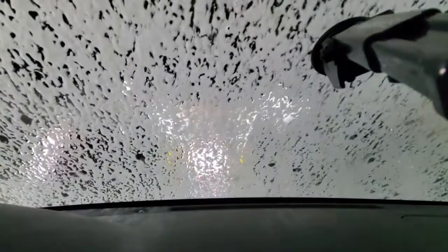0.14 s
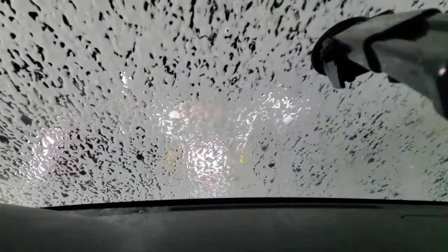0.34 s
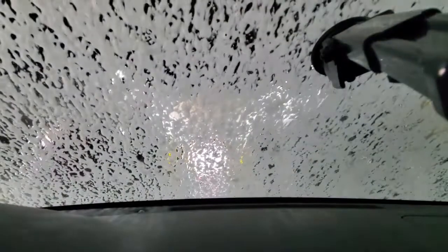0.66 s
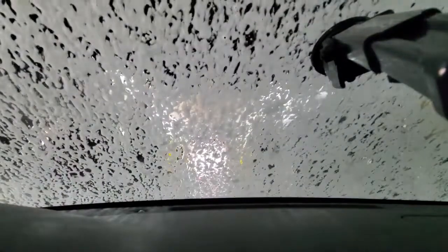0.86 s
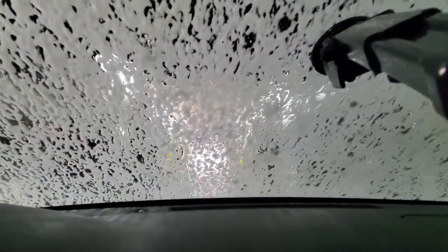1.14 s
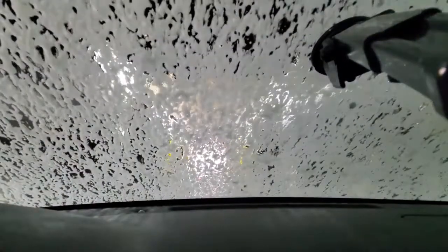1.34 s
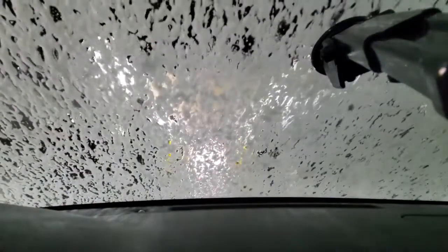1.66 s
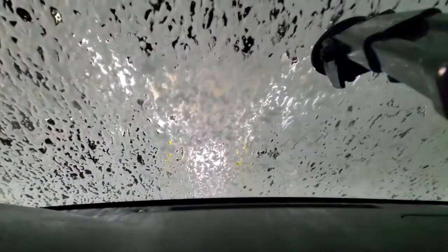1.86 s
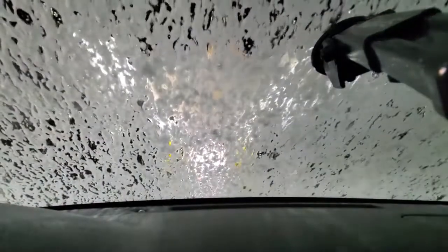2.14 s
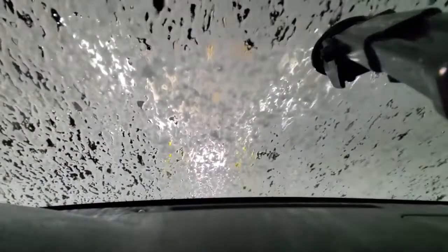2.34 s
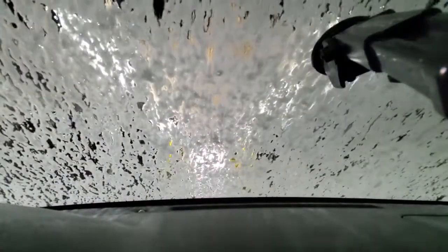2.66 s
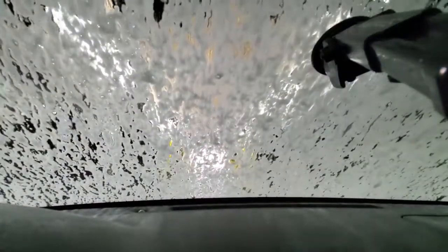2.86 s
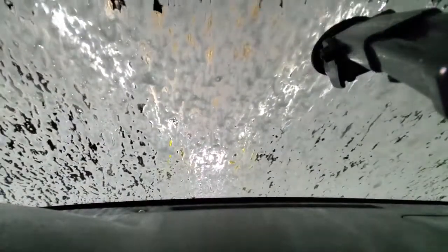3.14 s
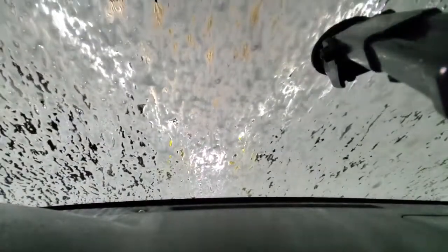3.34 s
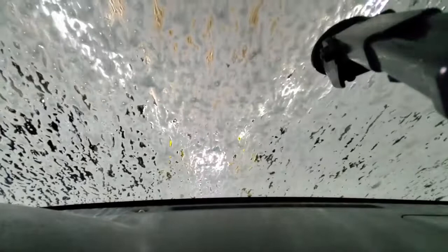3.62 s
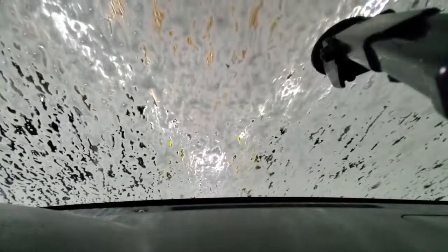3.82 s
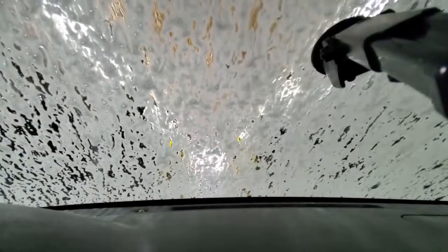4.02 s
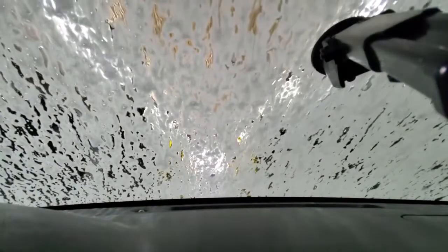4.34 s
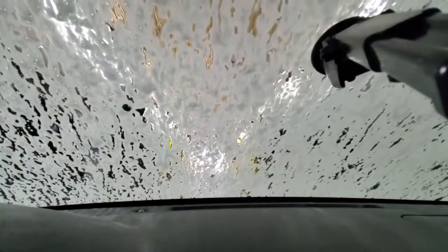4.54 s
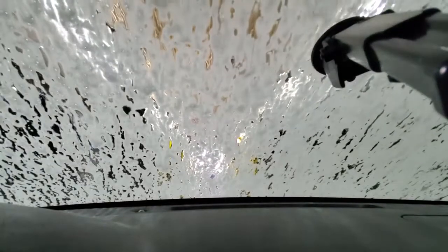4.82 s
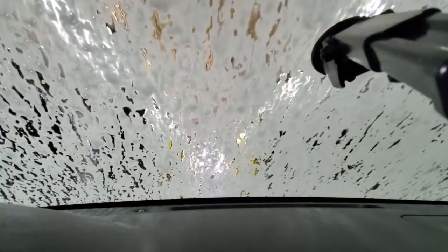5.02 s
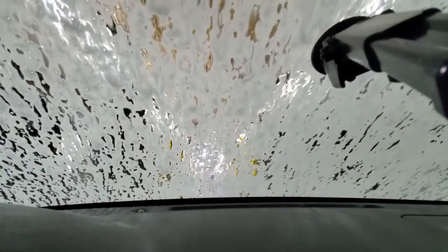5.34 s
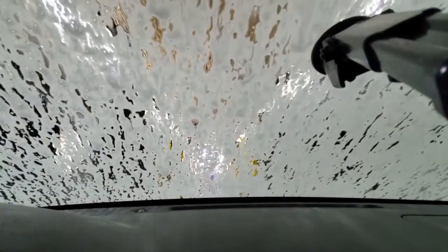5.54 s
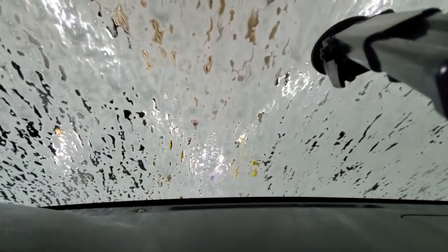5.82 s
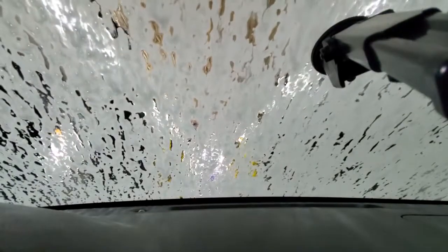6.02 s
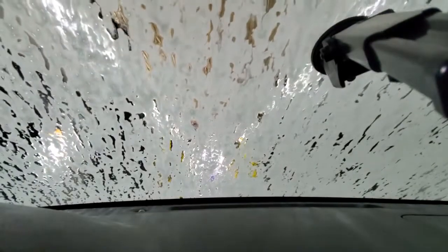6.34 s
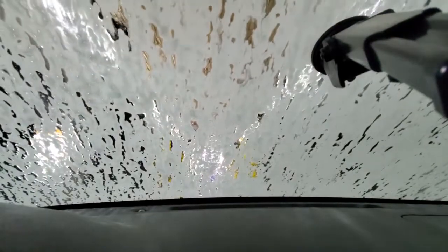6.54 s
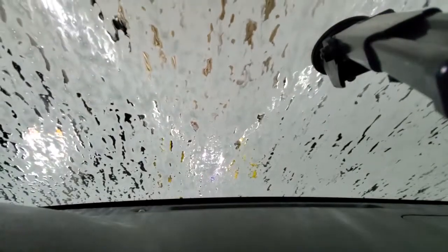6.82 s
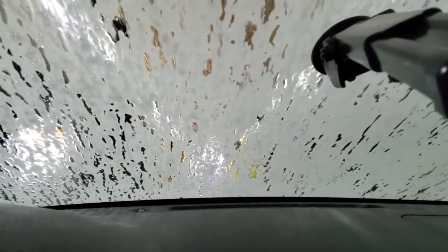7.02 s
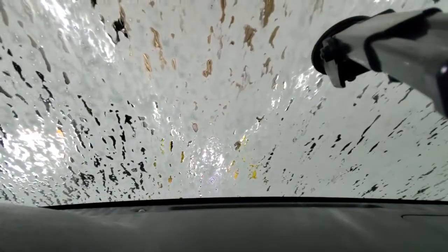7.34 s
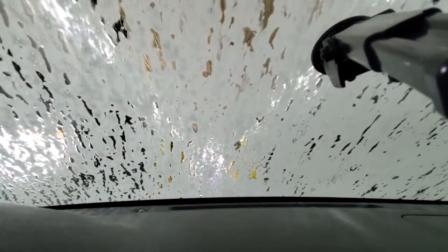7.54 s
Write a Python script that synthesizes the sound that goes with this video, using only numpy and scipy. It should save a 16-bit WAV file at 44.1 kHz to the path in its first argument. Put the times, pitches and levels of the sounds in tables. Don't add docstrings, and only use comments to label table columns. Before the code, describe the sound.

Close stereo microphones inside a car cabin catch water drumming on panels and a low rumble as the car is rocked along. Sharp wet slaps ring the windscreen and scatter droplets early on, with fizzing mist. The middle turns darker and boomier, with deep thuds of water overhead; after a sudden easing, side spray brightens again and final slaps tick the glass.

```python
import sys
import numpy as np
from scipy import signal
from scipy.fft import rfft, irfft, next_fast_len
from scipy.io import wavfile
from scipy.ndimage import uniform_filter1d, map_coordinates

SR = 44100
rng = np.random.default_rng(int(sys.argv[2]) if len(sys.argv) > 2 else 0)


def dump(signal):
    limited = np.clip(np.atleast_2d(signal).T, -1, 1)
    pcm = np.round(limited * 32767).astype(np.int16)
    wavfile.write(sys.argv[1], SR, pcm)


def how_loud(loudness_db):
    steps = np.asarray(loudness_db, float) / 20
    return 10 ** steps


N = 338247

# time in seconds, place (0 windscreen, 1 roof, 2 tail).
PLACE = [
    (0, 0),
    (.5, 0.14),
    (2, 0.16),
    (2.15, 0.7),
    (2.8, 0.72),
    (3.4, 0.47),
    (5.85, 1.36),
    (5.99, 1.3),
    (6.05, 2),
    (7.67, 1.87),
]
# centre in seconds, half length in seconds, lift in dB.
SWEEPS = [
    (.05, 0.25, 5.5),
    (1.95, 0.18, 0.5),
    (3.38, 0.059, 1.5),
    (3.53, 0.12, 4.5),
    (3.71, 0.093, 5),
    (4.1, 0.19, 1),
    (4.9, 0.14, 0),
    (5.81, .06, 4),
    (7.67, 0.32, 4.5),
]
# time in seconds, gain in dB.
JETS = [(0, 3), (.4, 2.5), (.95, 0), (1.2, 3.5), (2.4, 2.5), (2.6, 1), (3.1, 0.5), (3.7, 0), (4, -0.5),
        (5.4, -2), (6.3, -0.5), (7.1, 1), (7.67, 5.5)]
# frequency in Hz, density in dB per Hz.
SPATTER = [(4000, 4), (7000, -3), (8500, -12.5), (11500, -12), (13500, -8), (15400, -10), (15800, -60.5)]
# start in seconds, peak in dB, spatter in dB, glass pitch in Hz.
BLOBS = [(0.7035, -28.5, -20.5, 3140), (0.896, -26, -16, 2200), (1.083, -33.5, -18, 3300),
         (1.091, -32.5, -23, 2200), (1.142, -29, -20, 2180), (1.222, -35, -17, 2400),
         (1.2445, -28, -17.5, 2810), (1.259, -33.5, -20, 2990), (1.297, -29, -28, 2300),
         (1.389, -26.5, -26, 3060), (1.4496, -37, -19.5, 3040), (1.5444, -39.5, -16, 3000),
         (1.6445, -28, -21, 3000), (1.6504, -25, -18, 3420), (1.6568, -24.5, -19.5, 3220),
         (1.666, -33, -22, 2610), (1.7452, -22.5, -23, 2325), (1.778, -27, -23.5, 3800),
         (1.9679, -52, -17, 3660), (2.005, -33, -17, 2130), (2.0657, -29.5, -15, 3800),
         (2.0866, -25.5, -20, 2170), (2.18, -33.5, -17, 2490), (2.2025, -25.5, -25, 3070),
         (2.2363, -30, -19, 2170), (2.304, -26.5, -23, 3700), (2.378, -26, -21.5, 2200),
         (2.582, -38, -16, 2990), (2.642, -30, -17.5, 3040), (2.891, -23.5, -26.5, 3770),
         (2.946, -30, -17.5, 2580), (5.847, -38, -16.5, 4020), (7.502, -48, -11.5, 2240),
         (7.511, -47.5, -11, 2220)]
# start in seconds, peak in dB, glass pitch in Hz.
TIPS = [(0.223, -30, 2430), (0.731, -32, 3610), (0.8968, -18, 2800), (0.9958, -30.5, 2160),
        (1.056, -28.5, 3710), (1.2227, -14, 3430), (1.262, -22.5, 3080), (1.308, -34, 3300),
        (1.364, -25.5, 3540), (1.4758, -24, 3540), (1.6287, -27.5, 2840), (1.73, -24.5, 3650),
        (1.765, -25, 3470), (1.836, -26, 3240), (1.847, -24.5, 3700), (1.864, -32.5, 3500),
        (1.9105, -19, 3380), (1.917, -22.5, 3440), (1.929, -20, 3600), (2.0236, -28, 2070),
        (2.044, -27.5, 2200), (2.089, -28.5, 3760), (2.114, -32, 1810), (2.1243, -39.5, 2870),
        (2.162, -33.5, 3500), (2.212, -28, 3300), (2.227, -31.5, 3500), (2.2455, -26, 2075),
        (2.275, -33, 3400), (2.32, -26, 3230), (2.327, -24, 3080), (2.338, -28.5, 3630), (2.36, -24, 2980),
        (2.386, -25.5, 3410), (2.399, -24, 1975), (2.415, -33, 3360), (2.449, -30, 3000),
        (2.592, -29, 2140), (2.6858, -31, 2140), (2.712, -32, 3200), (3.0926, -31.5, 2490),
        (3.389, -33, 2150), (4.002, -35.5, 1970), (6.05, -35.5, 2870), (7.052, -31, 2540),
        (7.456, -29, 2180), (7.49, -36, 3330), (7.607, -26, 2820), (7.613, -29, 3500), (7.64, -31, 3040)]


def unit(x):
    return x / np.sqrt(np.mean(x ** 2) + 1e-20)


def curves(rows):
    s, *cols = np.transpose(rows)
    return [np.interp(np.arange(N) / SR, s, c) for c in cols]


def swells(rows):
    t = np.arange(0, N + 64, 64) / SR
    lift_db = sum(db * np.exp(-((t - s) / half) ** 2) for s, half, db in rows)
    return np.interp(np.arange(N) / SR, t, lift_db)


def wobble(rate):
    knots = rng.standard_normal(int(N * rate / SR) + 4)
    return map_coordinates(knots, [np.arange(N) * rate / SR])


def filtered(x, response):
    m = next_fast_len(N + 8192)
    return irfft(rfft(x, m) * response(np.fft.rfftfreq(m, 1 / SR)), m)[..., :N]


def coloured(mid_points, side_points, side_db):
    def along(points, hz):
        point_hz, db = np.transpose(points)
        return np.interp(np.log(hz + 1), np.log(point_hz + 1), db)
    return lambda hz: how_loud([along(mid_points, hz), along(side_points, hz) + side_db])


def stereo(pair):
    mid, side = pair / np.std(pair[0])
    return np.array([mid + side, mid - side])


def patchy(depth_db, wide, long):
    z = signal.stft(rng.standard_normal((2, N)), nperseg=512)[2]
    field = uniform_filter1d(rng.standard_normal(z.shape[1:]), wide, 0)
    field = uniform_filter1d(field, long, 1)
    return signal.istft(z * how_loud(depth_db * unit(field)), nperseg=512)[1][:, :N]


def peak(f, hz, width):
    return 1j * f * width / (hz * hz - f * f + 1j * f * width)


def body(force, modes, top_hz):
    place, = curves(PLACE)
    m = next_fast_len(N + 8192)
    f = np.fft.rfftfreq(m, 1 / SR)[:int(5 * top_hz * m / SR)]
    push = rfft(force, m)[:, :len(f)] / (1 + (f / top_hz) ** 4)
    peaks = np.array([(-1) ** i * peak(f, hz, width) for i, (hz, width, *_) in enumerate(modes)])
    side_db, *levels_db = np.transpose(modes)[2:]
    out = 0
    for k, db in enumerate(levels_db):
        ring = how_loud(np.array([db, db + side_db])) @ peaks
        nearness = np.clip(1 - abs(place - k), 0, 1)
        out = out + nearness * stereo(irfft(push * ring, m)[:, :N])
    return out


def flares(rows, half_s, side_db):
    out = np.zeros((2, N + SR))
    t = np.arange(-SR // 8, SR // 8) / SR
    for (s, hz, db), (turn, lean, drift) in zip(rows, rng.random((len(rows), 3))):
        phase = 2 * np.pi * (hz * t + turn + 150 * (drift - .5) * t * t)
        mid = np.sin(phase)
        side = how_loud(side_db) * np.sin(phase + 2 * np.pi * lean)
        bell = how_loud(db) * np.exp(-(t / half_s) ** 2)
        out[:, round(s * SR):][:, :len(t)] += bell * [mid + side, mid - side]
    return out[:, SR // 8:SR // 8 + N]


def drumming():
    # frequency in Hz, width in Hz, side share in dB,
    # then level in dB with water on the windscreen, roof and tail.
    cabin = [(105, 27, -16, -7.5, -13, -6.5), (124.3, 11.9, -28.5, 1.5, -3, -1.5),
             (139, 16.5, -25, -3, -3, 0.5), (164.6, 21.3, -15.5, -6.5, -5.5, -1),
             (191, 16.9, -11.5, -6, -6, 1), (217.3, 38, -15.5, -8, -12.5, -1),
             (264.3, 51, -15, -8.5, -14, -8)]
    panels = [(305.6, 37.4, -13.5, -6, -8, -0.5), (347, 12.8, -16, -3, -1, -1), (374.7, 24, -3, -2, -1, -2),
              (418, 24.4, -15.5, -6.5, 1, -1), (437.4, 19.6, -8, -4.5, 1, 1),
              (493.8, 27, -2, -4.5, -6.5, -4.5), (540.7, 23, -9, -3, -5.5, -2.5),
              (581.7, 34, -4.5, -6.5, -6, -8), (634.5, 42.6, -2, -10, -7.5, -10)]
    shell = [(701, 37, 0, 0, -0.5, 0.5), (760, 36.3, -1, 1.5, -2.5, 3.5), (803, 47, -0.5, -2, -1.5, 0.5),
             (912, 161, 0, -4.5, -5, -3), (1039, 137, -1.5, -1.5, -4.5, -1.5),
             (1197, 205, 1.5, -10, -11, -7), (1227, 30, 0, -17, -17, -6.5), (1328, 39, 0, -19, -20.5, -6),
             (1645, 62, -1.5, -8.5, -12, -4), (1903, 50, 0, -14, -19, -4.5),
             (2220, 45, 0, -20, -13.5, -7.5)]
    # time in seconds, load in dB.
    load = [(0, -25), (.1, -25), (.75, -26.5), (1.7, -25.5), (2.3, -20.5), (3.2, -21), (4, -18.5),
            (4.4, -15), (5.2, -14.5), (5.9, -19), (6.05, -27), (6.9, -24.5), (7.5, -19), (7.67, -23.5)]
    # centre in seconds, half length in seconds, lift in dB.
    gushes = [
        (1.1, 0.21, 1),
        (1.75, 0.42, 2),
        (2.4, 0.15, 1),
        (3.1, 0.18, 1),
        (4.9, 0.14, 0.5),
        (5.62, 0.22, 5),
        (6.65, 0.26, 2.5),
        (7.6, 0.3, 3),
    ]
    (load_db,), (place,) = curves(load), curves(PLACE)
    behind = np.clip(place - 1, 0, 1)
    boom_db = load_db - 3
    panel_db = -25 + 0.079 * (load_db - load_db.mean()) - 5.5 * behind
    panel_db = panel_db + swells(gushes) + 0.85 * wobble(9)
    wash_db = -33.5 - 4 * behind + swells(SWEEPS) + 0.3 * wobble(17)
    surge = wobble(11.0)
    boom = how_loud(boom_db + 0.16 * surge) * body(rng.standard_normal((2, N)), cabin, top_hz=680)
    panel = how_loud(panel_db + 0.35 * surge) * body(patchy(1.0, wide=1, long=18), panels, top_hz=1230)
    wash = how_loud(wash_db + 0.66 * surge) * body(patchy(1.7, wide=2, long=16), shell, top_hz=2200)
    return boom + panel + wash * how_loud([[-.7], [.7]])


def rocking():
    # frequency in Hz, width in Hz, side share in dB,
    # then level in dB with water on the windscreen, roof and tail.
    springs = [(41, 8.9, -27, -6.5, -3.5, -0.5), (55, 20, -20.5, -10, -8.5, 3), (74, 44, -9, -17, -19, -12)]
    # time in seconds, push in dB.
    push = [
        (0, -29),
        (.5, -35),
        (1.3, -28.5),
        (3.2, -26),
        (4, -33),
        (5.3, -34),
        (6, -32.5),
        (7, -34.5),
        (7.45, -26),
        (7.67, -24),
    ]
    # centre in seconds, lift in dB (negative in a lull).
    jolts = [(.4, -1), (.7, 6), (1.13, 4.5), (1.49, 2), (1.66, 6.5), (2.09, 2), (2.56, 4.5), (2.68, -10),
             (3.12, 4), (3.67, 5), (3.93, -5), (4.55, 4), (6.09, -8), (7.05, -9), (7.26, 2), (7.41, 2)]
    jolt_s = 0.046
    push_db, = curves(push)
    rumble_db = push_db + swells([(s, jolt_s, db) for s, db in jolts])
    return how_loud(rumble_db) * body(rng.standard_normal((2, N)), springs, top_hz=250)


def side_jets():
    # frequency in Hz, density in dB per Hz.
    spray_mid = [(710, -43), (1200, 0), (1690, -6.5), (1840, -5.5), (2170, -10.5), (3000, -23.5),
                 (3900, -41), (6600, -120)]
    spray_side = [(710, -25), (1200, -3), (2020, -12.5), (2320, -16.5), (2490, -24), (3000, -26.5),
                  (3900, -53), (6600, -120)]
    fizz_mid = [(1530, -10.5), (2600, -2), (2930, -1), (3610, -2.5), (5900, -19), (6640, -16), (8550, -26),
                (10300, -26), (14000, -25), (15400, -25.5)]
    fizz_side = [(1530, -34.5), (2600, 1.5), (3940, -3), (4860, -11.5), (6740, -18.5), (8060, -28),
                 (10900, -27.5), (13200, -27.5), (14800, -24.5), (15400, -33)]
    jets_db, = curves(JETS)
    opening = [(0, 0.32, 4)]
    spray_db = -43.5 + 0.28 * jets_db + 0.33 * swells(SWEEPS) + swells(opening)
    fizz_db = -50 + 0.79 * jets_db
    flurry = wobble(8.2)
    spray = stereo(filtered(patchy(2.7, wide=3, long=10), coloured(spray_mid, spray_side, side_db=3.5)))
    fizz = stereo(filtered(patchy(2.3, wide=8, long=5), coloured(fizz_mid, fizz_side, side_db=-1.5)))
    spray_gain = how_loud(spray_db + 2.0 + 0.25 * flurry)
    fizz_gain = how_loud(fizz_db + 0.56 + 0.59 * flurry + 0.25 * wobble(43))
    return spray_gain * spray + fizz_gain * fizz


def droplets(count=2200, per_slap=20):
    splash_db, lead_s, mean_delay_s = -21, 0.019, 0.024
    jets_db, = curves(JETS)
    hits = np.repeat([row[:2] for row in BLOBS + TIPS], per_slap, axis=0)
    when, pitch, size, side = rng.random((count + len(hits), 4)).T
    t = np.arange(256) / SR
    thrown_s = hits[:, 0] - lead_s - mean_delay_s * np.log(when[count:] + 0.0013)
    at = np.clip(np.append(when[:count] * N, thrown_s * SR), 0, N - 256).astype(int)
    hz = 2200 * 2.6 ** (pitch ** 1.3)
    jet_db = 1.3 * jets_db[at[:count]] - 58.5
    thrown_db = 0.48 * (hits[:, 1] + 28) - 28 + splash_db
    db = np.append(jet_db, thrown_db) - 5.1 * np.log(size + 0.041) - 6 * np.log2(hz / 3000)
    ring = np.sin(2 * np.pi * hz[:, None] * t) * np.exp(-t * hz[:, None] / 3.9)
    grains = how_loud(db)[:, None] * ring * (1 - np.exp(-t / 0.00047))
    where = (at[:, None] + np.arange(256)).ravel()
    return np.array([np.bincount(where, (grains * np.sqrt(2 * g)[:, None]).ravel(), N)
                     for g in (side, 1 - side)])


def landings():
    # centre in seconds, cabin mode in Hz, peak in dB.
    sheets = [(1.741, 142, -27), (1.856, 138, -21), (2.19, 130, -12.5), (2.375, 140, -19),
              (2.699, 123, -14), (2.998, 137, -21), (3.093, 129, -17), (3.372, 145, -18), (3.652, 141, -18),
              (3.707, 126, -15), (3.826, 129, -15), (3.971, 140, -12), (4.061, 127.5, -12.5),
              (4.2, 123, -10.5), (4.255, 125, -12.5), (4.355, 124.5, -14), (4.654, 131, -19),
              (4.769, 142, -15), (4.864, 126, -11.5), (4.974, 130, -11.5), (5.044, 133, -18.5),
              (5.108, 135, -13.5), (5.173, 120, -16), (5.233, 136.6, -13), (5.318, 202, -18),
              (5.323, 125, -9), (5.433, 125, -13), (5.642, 124, -14), (5.817, 139, -15.5),
              (7.239, 143, -21.5)]
    # centre in seconds, mode in Hz, peak in dB.
    lumps = [(0.025, 1083, -28.5), (0.06, 368, -32), (0.06, 1150, -30), (0.479, 556, -23),
             (0.723, 380, -21.5), (0.923, 356, -20), (0.968, 391, -22.5), (1.028, 372, -20),
             (1.102, 543, -19.5), (1.187, 330, -21.5), (1.197, 381, -20), (1.297, 374, -21.5),
             (1.601, 374, -29), (1.726, 351, -23.5), (1.886, 520, -21), (2.11, 416, -23.5),
             (2.32, 539, -20), (2.4, 533, -24), (2.424, 361, -28), (2.559, 363, -26), (2.938, 541, -28),
             (2.963, 392, -21.5), (3.138, 461, -25), (3.153, 384.6, -16), (3.268, 467, -25),
             (3.557, 570, -29), (3.577, 690, -25.5), (3.697, 724, -26), (3.751, 712, -27),
             (3.891, 369, -24), (4.056, 368, -22.5), (4.141, 393, -20), (4.709, 390, -24),
             (4.719, 968, -34.5), (4.839, 390, -21), (4.884, 547, -27.5), (4.959, 387, -20),
             (4.959, 447, -22.5), (5.019, 688, -30), (5.547, 462, -28), (5.587, 389, -19),
             (5.727, 441, -23.5), (5.792, 395, -21), (5.812, 567, -25.5), (5.941, 586, -29.5),
             (6.725, 443, -28), (6.815, 325, -27.5), (7.618, 363, -26.5),
             (.1, 744, -44), (.19, 1090, -39), (.25, 743, -41), (.36, 1136, -35), (.5, 733, -36),
             (.62, 770, -29.5), (0.599, 1310, -42), (2.15, 294, -29), (3.42, 994, -32), (3.45, 700, -34),
             (3.45, 135, -18.5), (3.631, 1160, -32), (4.08, 790, -31), (.2, 549, -30), (4.27, 380, -24),
             (4.33, 433, -29), (5.48, 268, -24.5), (5.56, 292, -25), (4.439, 127, -27), (4.54, 137, -27),
             (4.4, 393, -30), (5.152, 392, -34), (5.27, 395, -24), (5.36, 414, -27), (5.459, 380, -22),
             (5.87, 133, -14.5), (5.931, 412, -25.5), (5.96, 128, -23), (6.0, 515, -33)]
    return flares(sheets, half_s=0.034, side_db=-28) + flares(lumps, half_s=0.033, side_db=-9.5)


def mist():
    # centre in seconds, half length in seconds, lift in dB.
    passes = [
        (.3, .35, 7),
        (1.3, .35, 10),
        (1.9, 0.31, 13),
        (2.3, .15, 12),
        (7.55, .15, 9),
    ]
    hiss = stereo(filtered(patchy(3.1, wide=10, long=4), coloured(SPATTER, SPATTER, side_db=-3.0)))
    return how_loud(-74.5 + swells(passes)) * how_loud([[1.8], [-1.8]]) * hiss


def slaps():
    # frequency in Hz, width in Hz, level in dB.
    glass_modes = [(1720, 860, 4), (2180, 1460, 3.5), (3560, 500, 1.5), (4170, 940, -9.5),
                   (6740, 1800, -24.5)]
    blob_t60, tip_t60, spatter_t60 = 0.071, 0.065, 0.11
    tip_spatter_db = -33.5
    t = np.arange(SR // 8) / SR
    push, spatter, ping = np.zeros((3, 2, N + SR))
    rows = [(*blob, blob_t60) for blob in BLOBS]
    rows += [(s, db, tip_spatter_db, hz, tip_t60) for s, db, hz in TIPS]
    for s, db, spatter_db, hz, t60 in rows:
        t60 = t60 * how_loud(-0.17 * (db + 27.5))
        pan_db = -0.5 + 1 * rng.standard_normal()
        sides = how_loud([[pan_db / 2], [-pan_db / 2]])
        steps = np.repeat(rng.standard_normal(len(t) // 60 + 1), 60)[:len(t)]
        ragged = how_loud(2.7 * steps)
        tail = how_loud(-60 * t / (0.63 * t60)) + 0.57 * ragged * how_loud(-60 * t / (1.85 * t60))
        shape = (1 - np.exp(-t / (0.02 * t60))) * tail
        burst = shape * rng.standard_normal((2, 2, len(t)))
        at = round(s * SR)
        push[:, at:at + len(t)] += how_loud(db) * sides * burst[0]
        crackle = (1 - np.exp(-t / 0.00065)) * (1 + 1.9 * how_loud(-60 * t / 0.011))
        crackle = crackle * how_loud(2.0 - 60 * t / spatter_t60) * (burst[1] + .5 * burst[1, 0])
        spatter[:, at:at + len(t)] += how_loud(db + spatter_db) * sides * how_loud([[2.8], [-2.8]]) * crackle
        tone = np.sin(2 * np.pi * (hz * t + rng.random((2, 1))))
        tone = tone * (1 - np.exp(-t / 0.001)) * how_loud(-60 * t / (0.6 * t60))
        ping[:, at:at + len(t)] += how_loud(db - 3.5) * sides * ragged * tone

    def glass(f):
        ring = sum((-1) ** i * how_loud(db) * peak(f, hz, width) for i, (hz, width, db) in enumerate(glass_modes))
        return ring * f ** 2 / (f ** 2 + 1500 ** 2) / (1 + (f / 6200) ** 4)
    struck = how_loud(6.5) * filtered(push[:, :N], glass)
    drops = how_loud(8.5) * filtered(spatter[:, :N], coloured(SPATTER, SPATTER, 0))
    return struck + drops + ping[:, :N]


def scene():
    return drumming() + rocking() + side_jets() + droplets() + landings() + mist() + slaps()


def roll_off(x):
    return signal.sosfilt(signal.butter(12, 15740, fs=SR, output="sos"), x)


def record(dry):
    def microphone(f):
        return (f / 28) ** 4 / (1 + (f / 28) ** 4) * (f < 15740)
    heard = filtered(dry, microphone)
    return roll_off(heard)


dry = scene()
out = record(dry)
dump(out)
```